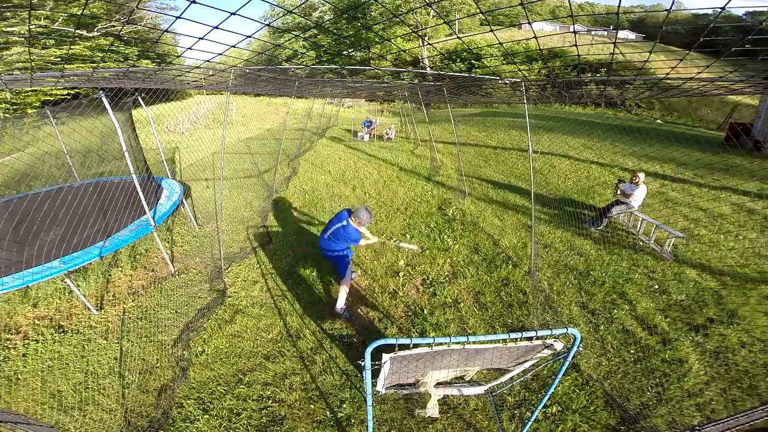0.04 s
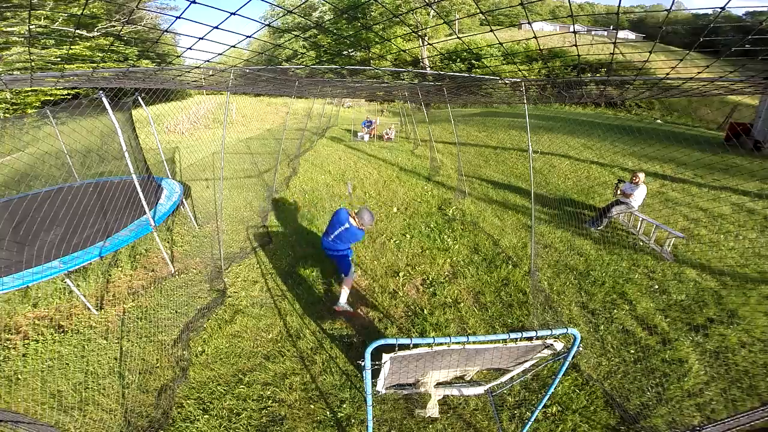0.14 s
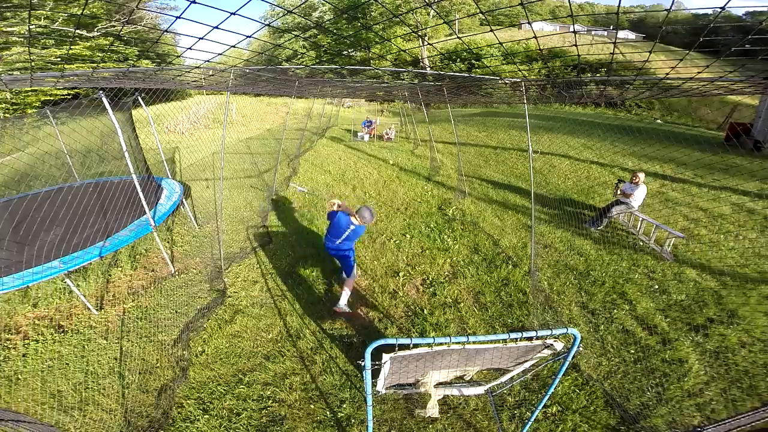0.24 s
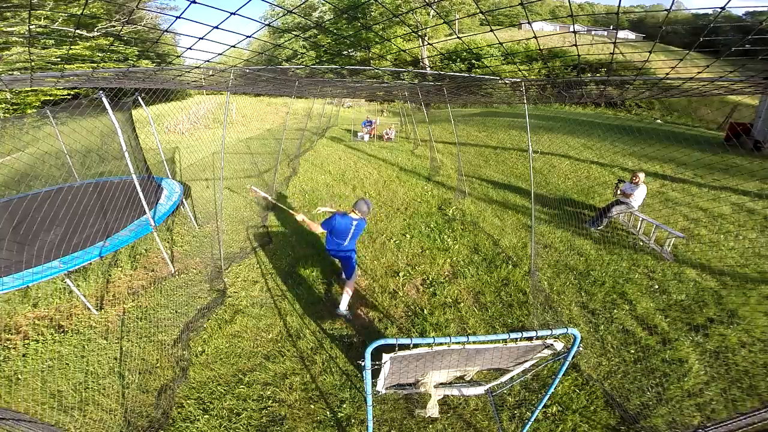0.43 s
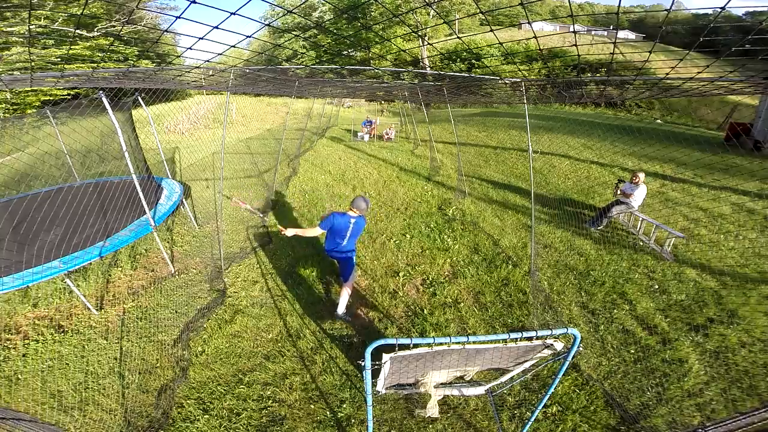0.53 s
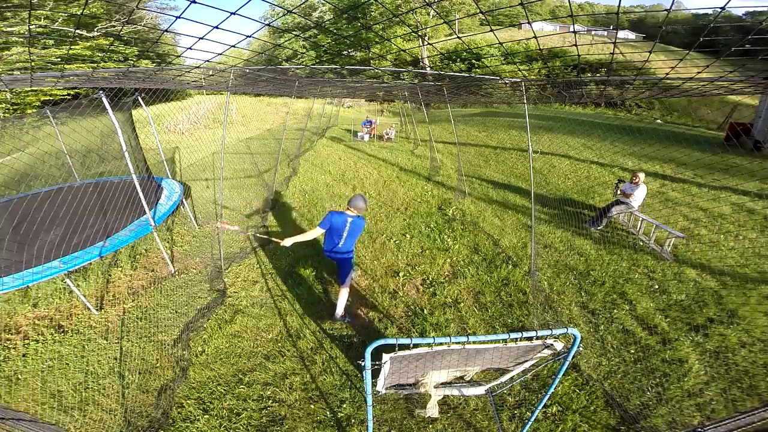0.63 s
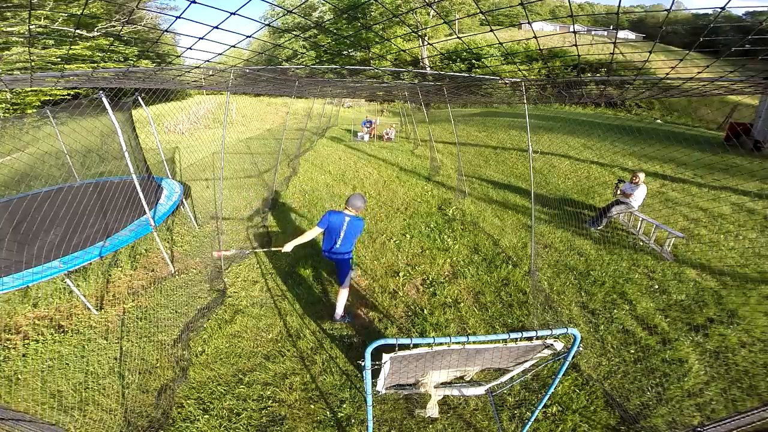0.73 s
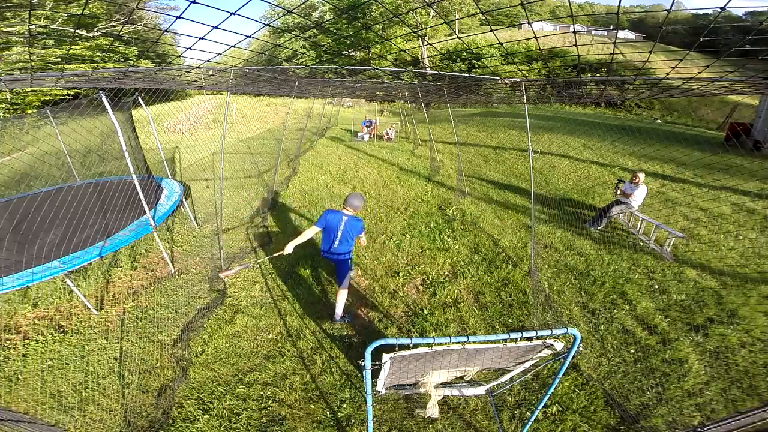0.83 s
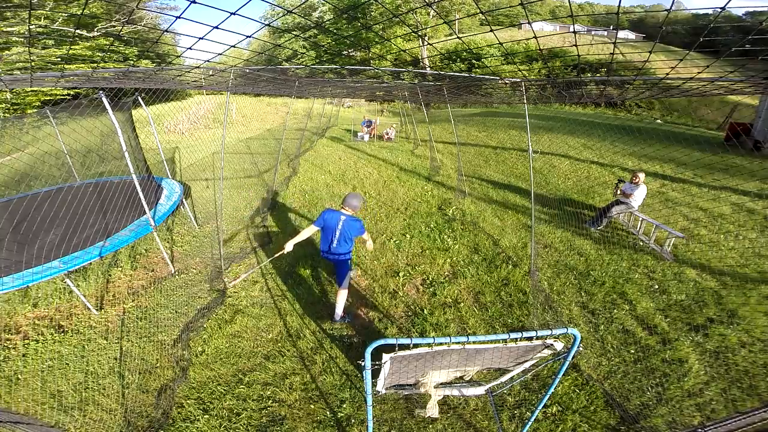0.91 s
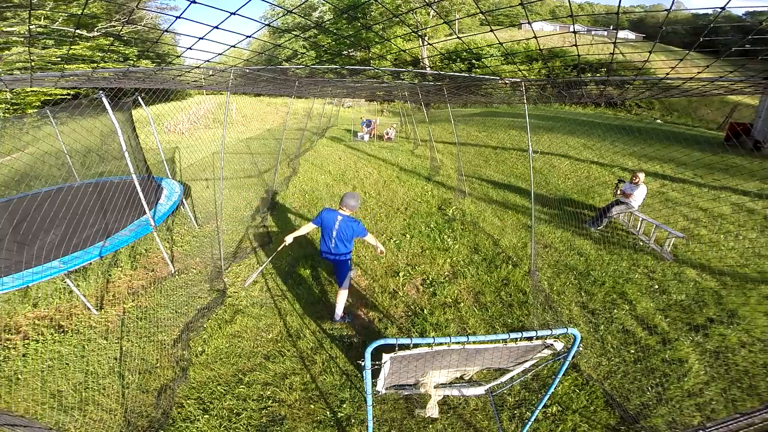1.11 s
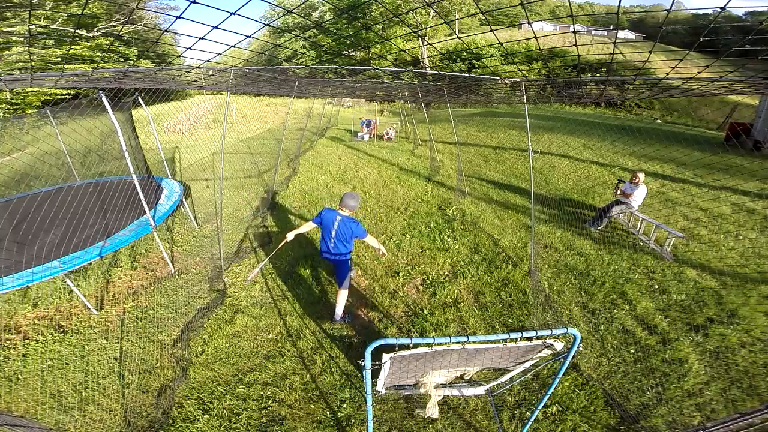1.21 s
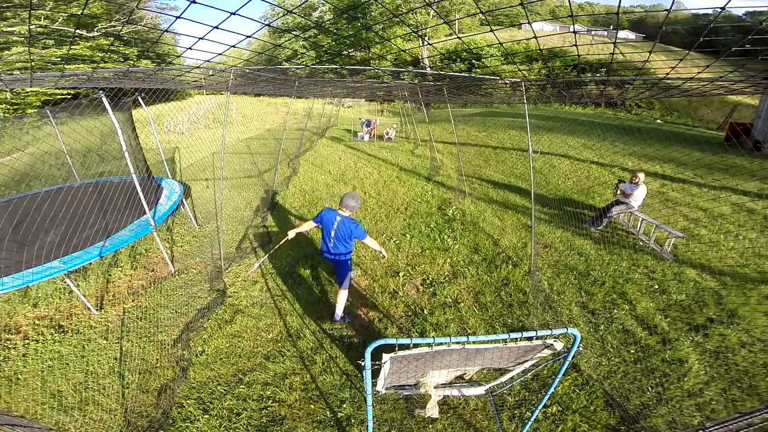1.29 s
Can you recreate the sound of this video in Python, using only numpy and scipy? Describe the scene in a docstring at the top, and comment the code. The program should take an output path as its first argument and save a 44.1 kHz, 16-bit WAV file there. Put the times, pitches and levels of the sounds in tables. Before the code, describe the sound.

A metal bat hits a ball with a loud crack and a wavering ring. The ball thuds into a net at once, then something hard clinks. Faint echoes fade over quiet backyard air and distant birds.

```python
"""Metal bat in a backyard batting cage

The bat hits the ball with a crack and its barrel rings on, bending in pitch and level as it swings round.
The ball thuds into the net and something hard clinks after it. The yard sends back faint echoes over
quiet air, birds and a hum. A limiter turns everything down at the crack, then slowly back up."""
import sys
import numpy as np
from scipy import signal
from scipy.fft import rfft, irfft
from scipy.io import wavfile
from scipy.ndimage import uniform_filter1d, minimum_filter1d

SR = 44100
rng = np.random.default_rng(int(sys.argv[2]) if len(sys.argv) > 2 else 0)


def wav_out(sig):
    """Save sig, one row per channel (or a flat mono array), as 16-bit PCM at SR to the path in sys.argv[1]."""
    wavfile.write(sys.argv[1], SR, np.round(np.clip(np.atleast_2d(sig).T, -1, 1) * 32767).astype(np.int16))


N = 59535
T = np.arange(N) / SR
FREQS = np.fft.rfftfreq(N, 1 / SR)
HIT_S, SOUND_M_S = .2279, 343


def amp(db):
    """Turn decibels into a number to multiply by."""
    return 10 ** (np.asarray(db) / 20)


def colour(points):
    """Join (Hz, dB) points into a gain for every frequency."""
    hz, db = np.array(points, float).T
    return amp(np.interp(np.log(FREQS + 1), np.log(hz), db))


def noise(gain):
    """Noise shaped by a gain for every frequency, then scaled to a strength (rms) of 1."""
    x = irfft(rfft(rng.standard_normal(N)) * gain, N)
    return x / x.std()


def push(at, points):
    """One sudden push of air, with its tone set by (Hz, dB) points."""
    cepstrum = irfft(np.log(colour(points)), N)
    cepstrum[1:] *= 2 * (np.arange(1, N) < N // 2)  # packs the energy at the start of the pulse
    pulse = irfft(np.exp(rfft(cepstrum)), N)
    return np.interp(T - at, T, pulse, left=0)


def decay(at, rise, fade):
    """Rise smoothly, then die away. A fade time is the seconds it takes to fall 60 dB."""
    age = np.maximum(T - at, 0)
    attack = np.sin(np.pi / 2 * np.minimum(age / rise, 1)) ** 2
    return attack * np.exp(-np.log(1000) * age / fade)


def swell(at, length):
    """A rounded rise and fall."""
    return np.sin(np.pi * np.clip((T - at) / length, 0, 1))


def ring(tones, at, rise, away=0):
    """The fading tones of a struck object. Moving away lowers their pitch (the Doppler effect)."""
    clock = np.cumsum((T > at) * (1 - away / SOUND_M_S)) / SR
    return sum(amp(db) * np.sin(2 * np.pi * hz * clock) * decay(at, rise, fade) for hz, db, fade in tones)


# The tone of the air. Each row: frequency in Hz, relative level in dB.
AIR_TONE = [(25, 3), (70, -1.5), (140, 0), (300, -6), (600, -8.5), (1080, -9.5), (1300, -16), (2200, -17),
            (3500, -20), (5400, -20), (7000, -32), (12000, -37.5), (15000, -44), (17000, -67.5)]

def air():
    """Quiet outdoor air whose level wanders gently."""
    wander_db = .6 * np.interp(T, np.linspace(0, T[-1], 14), rng.standard_normal(14))
    return amp(-53.5 + wander_db) * noise(colour(AIR_TONE))


# The tones of the hum. Each row: pitch in Hz, level in dB.
HUM_TONES = [(503, -66.5), (601, -66), (1004, -64.5)]

def hum():
    """A faint, steady hum."""
    return sum(amp(db) * np.sin(2 * np.pi * hz * T) for hz, db in HUM_TONES)


# Bird notes. Each row: start and length in seconds, first and last pitch in Hz, level in dB.
BIRD_NOTES = [(.015, .03, 5100, 4200, -77), (0.065, 0.052, 5000, 5450, -73),
              (0.145, 0.028, 3870, 4960, -58), (0.164, 0.033, 5210, 5440, -56.5),
              (.643, 0.023, 3820, 3850, -58.5), (0.866, .05, 6332, 6340, -69),
              (0.976, 0.033, 5530, 5240, -64), (1.025, 0.019, 3460, 3150, -59),
              (1.058, 0.079, 4060, 4070, -64.5), (1.063, 0.046, 5500, 5400, -65),
              (1.145, 0.026, 5040, 4150, -64.5)]

def birds():
    """Short sliding whistles, blurred by distance."""
    notes = np.zeros(N)
    for at, length, first_hz, last_hz, db in BIRD_NOTES:
        pitch = np.interp(T, [at, at + length], [first_hz, last_hz])
        notes += amp(db) * swell(at, length) * np.sin(2 * np.pi * np.cumsum(pitch) / SR)
    blur = 1 + .9 * noise(np.exp(-FREQS / 130))
    return notes * blur


# Soft rushes of noise. Each row: start and length in seconds, middle frequency in Hz, level in dB.
SOFT_RUSHES = [(0.174, 0.042, 42.8, -44.5), (0.159, .055, 170, -53), (0.31, .04, 210, -49),
               (0.032, 0.22, 343, -58.5), (0.323, .05, 1100, -46), (0.408, .06, 1200, -53),
               (0.413, .1, 2550, -48.5), (0.846, 0.044, 40.6, -49.5), (0.848, 0.051, 280, -61),
               (0.863, 0.056, 1850, -60), (0.867, 0.057, 3895, -64.5), (1.032, 0.09, 3220, -65),
               (1.23, 0.023, 720, -53.5)]

def rushes(width_octaves=.2):
    """Brief soft swells of noise: the swing, echoes of the crack, rustles and footsteps."""
    sound = np.zeros(N)
    for at, length, hz, db in SOFT_RUSHES:
        octaves_off = np.log2((FREQS + 1) / hz)
        band = 1 / (1 + (octaves_off / width_octaves) ** 2)
        sound += amp(db) * swell(at, length) * noise(band)
    return sound


# The tones of the squeak. Each row: pitch in Hz, level in dB.
SQUEAK_TONES = [(3850, -52), (5300, -58.5), (6450, -58), (8080, -62)]

def squeak():
    """A faint squeak just before the hit."""
    tones = sum(amp(db) * np.sin(2 * np.pi * hz * T) for hz, db in SQUEAK_TONES)
    return swell(at=.188, length=.018) * tones


# The wash of sound off grass, net and trees. Each row: frequency in Hz, relative level in dB.
WASH_TONE = [(100, -3.5), (600, -4), (1200, 2), (2000, -4), (2700, 3), (3400, -6.5), (5300, -7),
             (7000, -24.5), (9500, -29), (14000, -55)]
# Echoes. Each row: delay in seconds, the bat's speed away from the echoing surface in m/s, level in dB.
YARD_ECHOES = [(.085, -4, -32), (.09, 19, -36.5), (.19, -9.5, -39), (.23, 12.5, -38), (.32, -12, -40.5),
               (.41, -9, -51.5), (.55, -6.5, -54), (.63, -11.5, -55.5), (.77, -10.5, -59),
               (.87, -17.5, -56.5), (.99, -9.5, -60.5)]

def yard(rise=.0051, echo_fade=.48):
    """The yard returns a soft wash, and echoes of the bat's main tone shifted in pitch by the swing."""
    wash = amp(-35.5) * noise(colour(WASH_TONE)) * decay(HIT_S, rise, fade=1)
    main_hz = BARREL_TONES[0][0]
    echoes = sum(ring([(main_hz, db, echo_fade)], HIT_S + lag, rise, away)
                 for lag, away, db in YARD_ECHOES)
    flutter = 1 + .55 * noise(np.exp(-FREQS / 35.2))  # many paths make the echoes uneven
    return wash + echoes * flutter


# Quick taps. Each row: start in seconds, pitch in Hz, level in dB, fade time in seconds.
CLINK_TAPS = [(.5359, 6300, -21.5, 0.0053), (.5367, 5020, -15.5, 0.0048), (.5372, 2420, -21, 0.0051),
              (.5374, 766, -32.5, 0.015)]
# The gritty noise of the taps. Each row: frequency in Hz, relative level in dB.
GRIT_TONE = [(200, -14), (700, -0.5), (3000, 6.5), (7800, 4), (8800, -19.5), (12500, -21.5), (14000, -40)]
# The ring they leave. Each row: pitch in Hz, level in dB, fade time in seconds.
CLINK_TONES = [(4670, -35, 0.019), (4940, -39, 0.11), (6928, -56.5, 0.11)]

def clink(rise=.00037):
    """Something hard rattles, perhaps on the cage frame, and rings thinly."""
    start = CLINK_TAPS[0][0]
    taps = sum(ring([(hz, db, fade)], at, rise) for at, hz, db, fade in CLINK_TAPS)
    grit = amp(-24.5) * noise(colour(GRIT_TONE)) * decay(start, rise, fade=.017)
    return taps + grit + ring(CLINK_TONES, start, rise)


# The ball's thud in the net. Each row: frequency in Hz, relative level in dB.
THUD_TONE = [(40, -38.5), (90, -12), (170, 0.5), (350, -3.5), (600, 0), (900, -14), (1400, -22),
             (3000, -41.5), (6000, -72.5), (15000, -97)]

def thud(at=.2558):
    """The net catches the ball, which rebounds a little."""
    rebound = amp(-21.5) * push(at + .003, THUD_TONE)
    return amp(29.5) * (push(at, THUD_TONE) + rebound)


# The barrel's tones, main one first. Each row: pitch in Hz, relative level in dB, fade time in seconds.
BARREL_TONES = [(2101, 1.5, 0.59), (1570, -9, 0.013), (1903, 1.5, 0.02), (2592, 0, 0.041),
                (2621, -26, 0.67), (3377, -15.5, 0.0289), (4235, -24.5, 0.19), (4224, -21.5, 0.13),
                (5480, -23.5, .07), (5634, -18, .07), (6100, -21.5, 0.057), (6750, -26.5, 0.07),
                (8400, -39.5, 0.04), (10160, -39, 0.1)]
# The swing. Each row: time in seconds, speed away from us in m/s, relative level sent our way in dB.
SWING_PATH = [(0.229, 13, 1.5), (0.259, 9, -4), (.28, 7, -12), (0.298, 6.5, -13.5), (.32, 4, -34),
              (.355, 1.44, -22.5), (.39, -0.16, -12.5), (0.462, 0.4, -4.5), (.52, 1, -3),
              (0.601, .2, -13.5), (.7, 2.5, -12)]
# Reflections from things nearby. Each row: frequency in Hz, relative level in dB.
NEARBY_TONE = [(500, -13.5), (2100, -17.5), (3500, -3), (5500, -3.5), (15000, 0.5)]

def barrel(rise=.0018, ground_lag=.0093):
    """The bat's thick end rings as it swings, wavering as it mixes with its reflection off the ground."""
    when, speed, facing_db = np.array(SWING_PATH).T
    away = np.interp(T, when, speed)
    direct = ring(BARREL_TONES, HIT_S, rise, away)
    ground = ring(BARREL_TONES[:1], HIT_S, rise, away + 7.7)  # the mirror image moves away faster
    ground *= decay(HIT_S + ground_lag, rise, fade=.35)
    ringing = (direct - amp(-1.5) * ground) * amp(np.interp(T, when, facing_db) - .5)
    nearby = amp(-28) * noise(colour(NEARBY_TONE)) * decay(0, rise=ground_lag, fade=.091)
    return ringing + signal.fftconvolve(ringing, nearby)[:N]


# The three parts of the crack. Each row: frequency in Hz, relative level in dB.
CONTACT_TONE = [(40, -36), (100, -15), (200, -6), (380, -1), (800, 1.5), (1400, -2.5), (2500, -13.5),
                (4000, -39.5), (6500, -47), (9000, -57), (15000, -73)]
SNAP_TONE = [(100, -30.5), (700, -8), (1500, 2.5), (2600, -2.5), (4000, -4.5), (6500, -20.5), (8000, -24.5),
             (14500, -44.5), (16500, -71)]
CRACKLE_TONE = [(100, -23.5), (400, -2.5), (1100, 1.5), (2200, -13.5), (3500, -7.5), (6200, -13.5),
                (8000, -20.5), (13000, -34), (16000, -54)]

def crack():
    """The ball pushes on the bat, then springs off with a snap and a short crackle."""
    contact = -amp(34) * push(HIT_S, CONTACT_TONE)
    snap = amp(23.5) * push(HIT_S + .00055, SNAP_TONE)
    crackle = amp(-9) * noise(colour(CRACKLE_TONE)) * decay(HIT_S, rise=.0018, fade=.04)
    return contact + snap + crackle


def scene():
    """Add up the sounds that reach one microphone."""
    background = air() + birds() + rushes() + squeak() + yard()
    return (background + clink() + thud() + barrel() + crack())[None]


def record(dry, limit_db=.98, release_db_per_s=16, top_hz=15600):
    """The microphone loses one narrow band, hum joins in, a limiter acts and the top treble is cut."""
    notch = signal.iirnotch(1017, Q=19, fs=SR)
    x = signal.lfilter(*notch, dry[0]) + hum()
    over_db = np.maximum(20 * np.log10(np.abs(x) + 1e-9) - limit_db, 0)
    ahead_db = -minimum_filter1d(-over_db, size=200)  # spot each peak just before it comes
    recovery_db = release_db_per_s * T
    cut_db = np.maximum.accumulate(ahead_db + recovery_db) - recovery_db  # down fast, back up slowly
    x = x * amp(-uniform_filter1d(cut_db, size=100))
    treble_cut = signal.ellip(8, .2, 70, top_hz, fs=SR, output="sos")
    return signal.sosfilt(treble_cut, x)[None]


dry = scene()
out = record(dry)
wav_out(out)
```